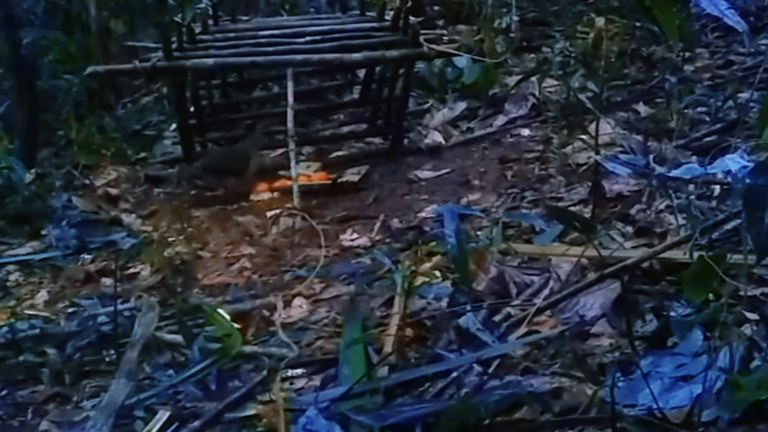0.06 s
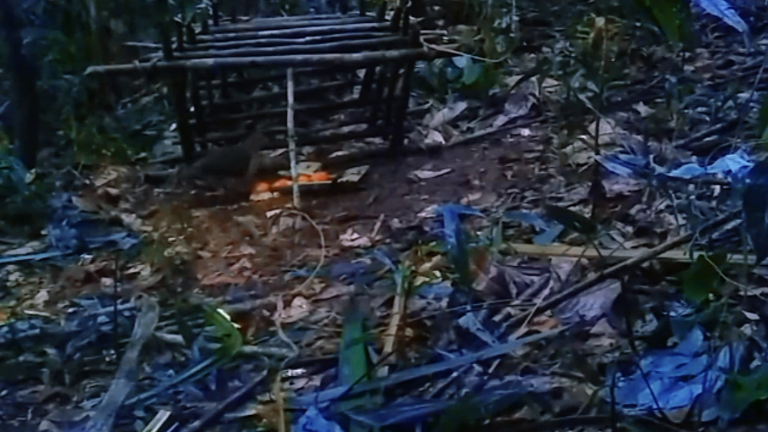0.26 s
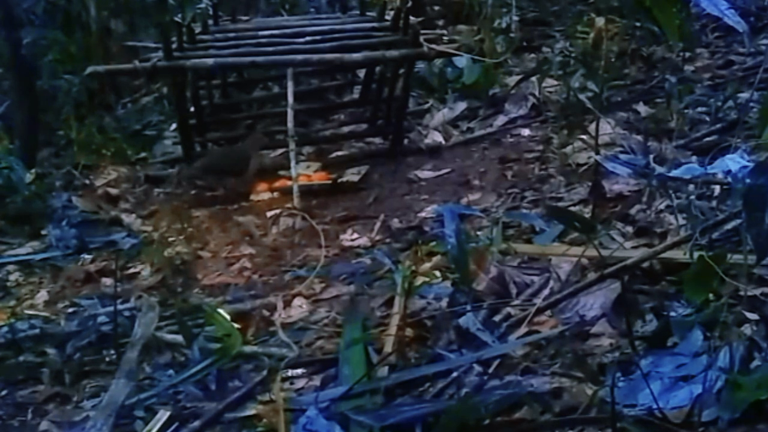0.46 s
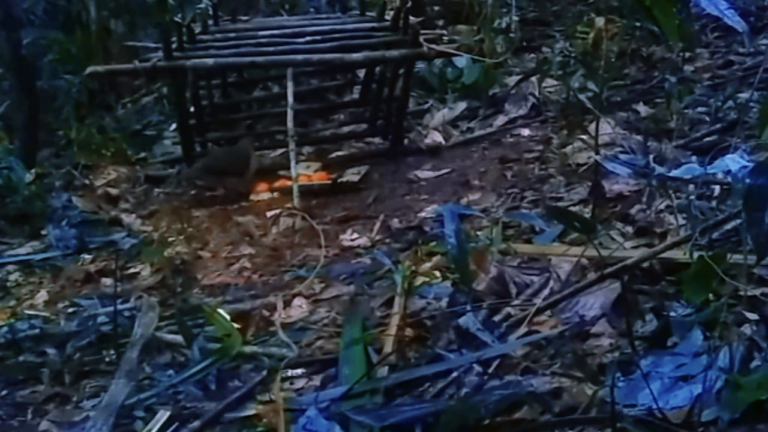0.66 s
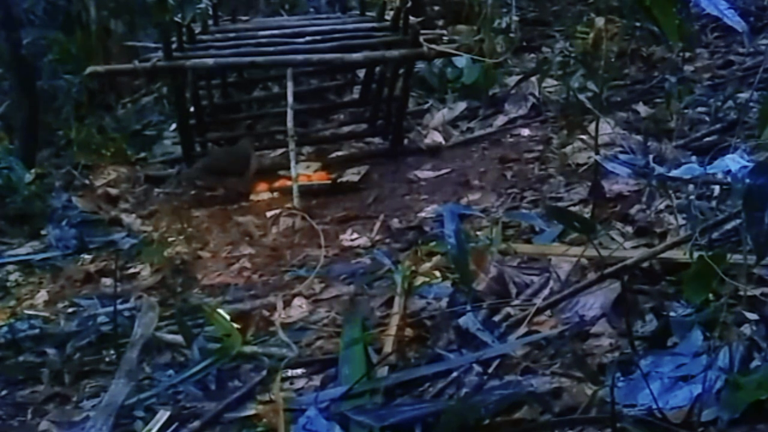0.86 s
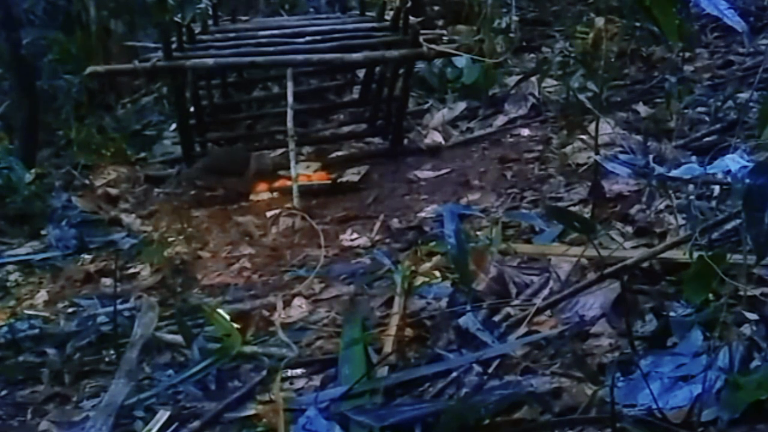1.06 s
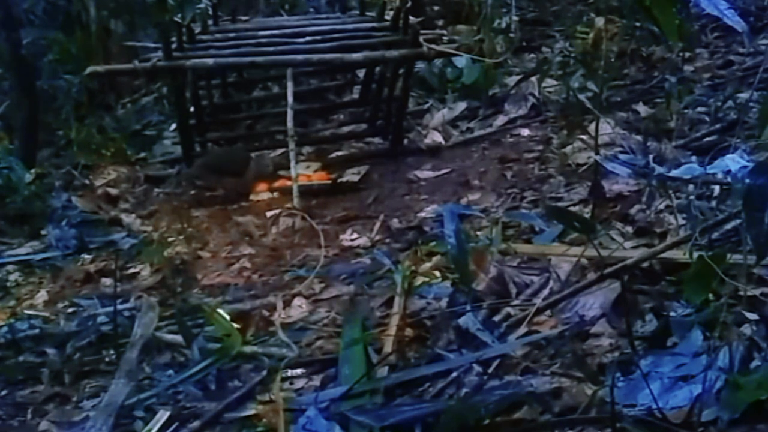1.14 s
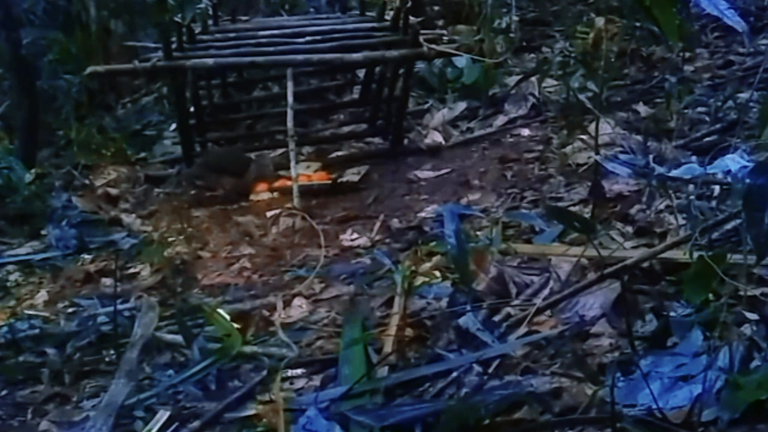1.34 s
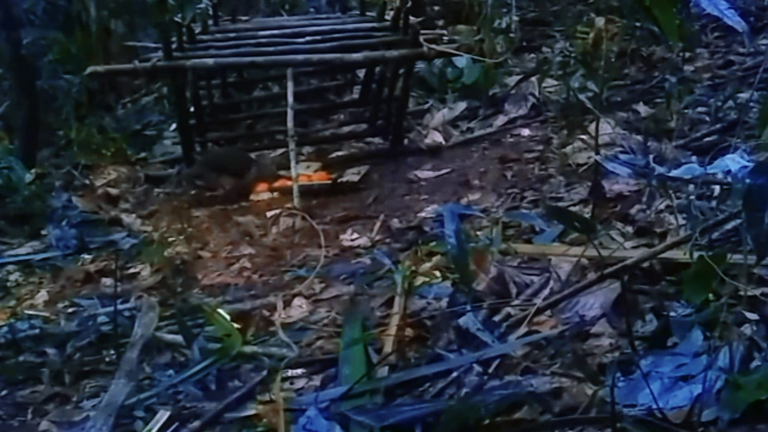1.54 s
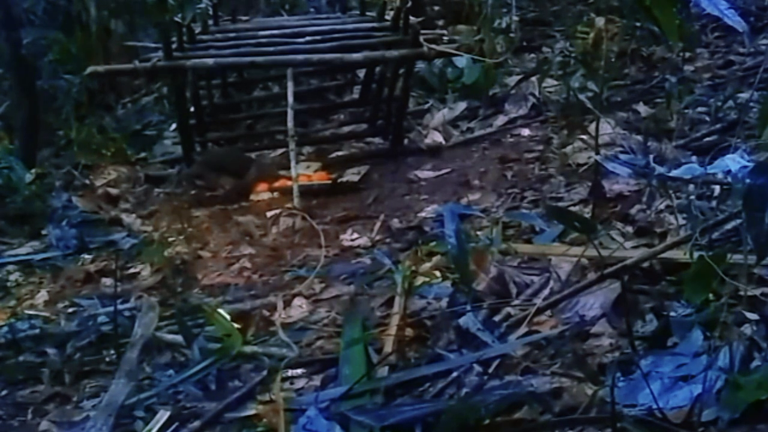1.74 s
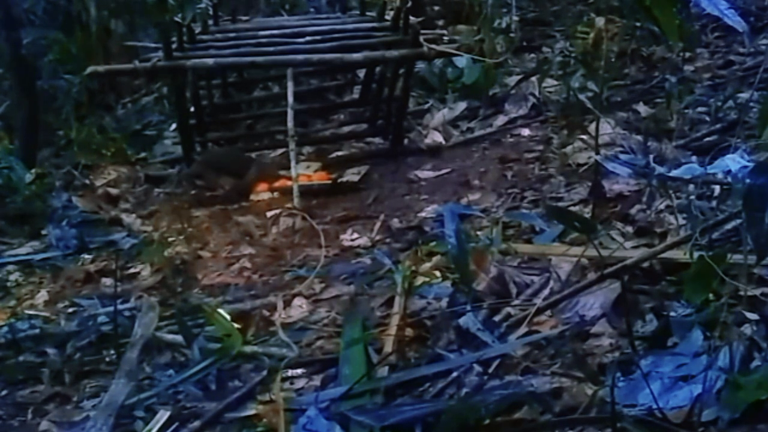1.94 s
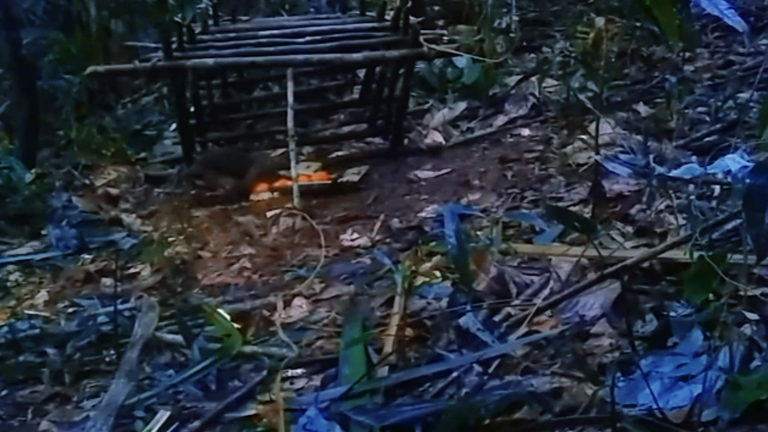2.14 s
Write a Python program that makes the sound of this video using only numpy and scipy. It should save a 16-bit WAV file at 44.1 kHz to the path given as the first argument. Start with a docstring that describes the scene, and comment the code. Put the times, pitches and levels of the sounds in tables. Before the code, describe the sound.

A loud, high whistle, probably a bird, rises, holds and drops in a quiet forest.

```python
"""First a distant bird pipes faintly over low rumble and foliage hiss; then one long whistle stands out.
The microphone is on a forest floor. The whistler, unseen and probably a bird, gives a fast squeaky rise,
a thin held note near 6.4 kHz and a final drop. Echoes from the trunks beat against the note and ring on.
Farther off, the short low piping continues, with thin notes of other animals and soft leaf rustles."""
import sys
import numpy as np
from scipy import signal
from scipy.fft import rfft, irfft
from scipy.io import wavfile
from scipy.ndimage import uniform_filter1d

SR = 44100
rng = np.random.default_rng(int(sys.argv[2]) if len(sys.argv) > 2 else 0)


def generate_wav(signal):
    """Clip the signal to [-1, 1] and save it as 16-bit WAV at the path in sys.argv[1]."""
    frames = np.transpose(np.atleast_2d(signal))
    scaled = np.clip(frames, -1, 1) * 32767
    pcm = np.round(scaled).astype(np.int16)
    wavfile.write(sys.argv[1], SR, pcm)


N = 97020
T = np.arange(N) / SR
CUT_HZ = 15700  # top of the recorder's range


# The whistle's three phases: t/s, f/Hz, fundamental level/dB, octave level/dB
RISE = [(.233, 682.4, -69, -45), (.237, 688, -48, -30), (.243, 819, -52, -35.5), (.251, 919, -47, -34.5),
        (.2545, 1010, -36, -52), (.258, 1452, -23, -36), (.262, 1483, -21.5, -40),
        (.265, 1594, -24.5, -50.5), (.27, 1893, -28, -58), (.276, 2224, -46.5, -65),
        (.285, 2706, -32, -41.5), (.294, 2740, -30.5, -41.5), (.301, 2777, -27.5, -45),
        (.305, 3116, -48.5, -58), (.322, 4240, -46, -57.5), (.335, 5100, -57, -60.5),
        (.344, 5480, -36, -51), (.352, 5900, -49.5, -41.5), (.368, 6480, -56, -45)]
HOLD = [(.38, 6430, -52, -46.5), (.405, 6520, -43, -35.5), (.422, 6640, -40, -33.5),
        (.443, 6448, -32.5, -47.5), (.47, 6410, -30.5, -50.5), (.51, 6365, -32, -45),
        (.565, 6316, -33.5, -33.5), (.61, 6328, -33, -39), (.655, 6278, -36, -38.5),
        (.695, 6402, -35.5, -41.5), (.745, 6400, -34, -41), (.785, 6486, -41, -50), (.85, 6510, -40.5, -44),
        (.91, 6416, -40, -40.5), (.965, 6230, -49, -46), (1.005, 6277, -42, -43), (1.023, 6132, -33.5, -42),
        (1.048, 6060, -40, -48), (1.064, 5997, -31, -45.5), (1.087, 5630, -29, -55),
        (1.108, 5515, -29.5, -56.5)]
FALL = [(1.118, 5280, -34.5, -58.5), (1.126, 4957, -47, -58), (1.131, 4394, -29.5, -70),
        (1.138, 3585, -33.5, -53.5), (1.148, 3311, -31.5, -52), (1.158, 3348, -33, -49),
        (1.162, 3357, -37.5, -74), (1.174, 3520, -62, -47)]
# Upper partials and rasp on the rise, before the throat colours them: t/s, level/dB
EDGE = [(.233, -62.5), (.24, -54.5), (.26, -54.5), (.272, -57), (.29, -47), (.305, -54), (.32, -49),
        (.335, -63.5), (.37, -82)]
# Throat resonances: f/Hz, gain/dB
THROAT = [(1800, -10), (2900, 7), (4100, -10), (5700, -2.5), (6900, -10.5), (8300, 1.5), (10000, -14),
          (12500, 9.5), (14000, 1), (15500, -18.5)]

def whistle():
    """Foreground: one gliding oscillator, rough on the rise, nearly pure when held, hissy as it drops."""
    call = list(RISE) + list(HOLD) + list(FALL)
    start, end = call[0][0], call[-1][0]
    gate = np.clip((T - start) / .002, 0, 1) * np.clip((end - T) / .004, 0, 1)
    rising = T < RISE[-1][0]
    hz = uniform_filter1d(curve(call), size=130)
    hz *= 1 + .0012 * wander(77) + .0088 * rising * wander(320)  # pitch jitter, strongest on the rise
    phase = 2 * np.pi * np.cumsum(hz) / SR
    tone = amp(curve(call, column=2) - 1.85 * wander(60)) * np.sin(phase)
    tone += amp(curve(call, column=3) + 2 * wander(45)) * np.sin(2 * phase)
    edge = amp(curve(EDGE)) * rising
    rolloff_db_per_octave, flicker_db = -6.5, 3
    for k in range(3, 16):
        db = rolloff_db_per_octave * np.log2(k / 3) + flicker_db * wander(129)
        tone += edge * amp(db) * colour_at(k * hz, THROAT) * (k * hz < CUT_HZ) * np.sin(k * phase)
    rasp = noise(lambda f: colour_at(f, THROAT) * f / (f + 700) / np.hypot(1, f / 3900))
    fall_hiss = swell(FALL[0][0], end - FALL[0][0]) * noise_band(hz=10500, width_hz=5000, power=4)
    return gate * (np.sqrt(2) * tone + amp(-1) * edge * rasp + amp(-65) * fall_hiss)


# Echo bands of the trees: f/Hz, early level/dB, early t60/s, late level/dB, late t60/s
SCATTER = [(660, -24, 0.41, -30.5, 0.91), (1450, -13, 0.4, -19, 0.27), (3230, -11.5, 0.25, -16, 0.92),
           (5770, -6.5, 0.24, -18, 0.69), (9300, -12.5, 0.2, -27.5, 0.29), (13000, -11, .16, -33.5, .6)]

def scatter(x):
    """Trunks and leaves around the microphone return dense echoes, with a quick and a slow decay."""
    centres = np.log([row[0] for row in SCATTER])
    build_up = 1 - np.exp(-T / .005)
    tail = 0
    for weights, (_, early_db, early_t60, late_db, late_t60) in zip(np.eye(len(SCATTER)), SCATTER):
        white = rng.standard_normal(N)
        band = shaped(white, lambda f: np.sqrt(np.interp(np.log(f + 1), centres, weights)))
        for db, t60 in ((early_db, early_t60), (late_db, late_t60)):
            decay = np.exp(-np.log(1000) * T / t60) * build_up
            tail += amp(db) * band * decay / np.sqrt(2 * np.sum(decay ** 2))
    return signal.fftconvolve(x, tail)[:N]


# Share of the whistle sent into the trees: t/s, gain/dB
SEND = [(.23, -3), (.32, -5), (.45, -8.5), (.68, 0), (.8, -1), (.92, 13), (1.02, 6), (1.09, -6),
        (1.16, 1.5)]

def through_trees(call):
    """The call reaches the microphone directly and by way of the trees; the paths beat together."""
    return call + scatter(call * amp(curve(SEND)))


# The distant bird's notes, before the direct and echo gains: t/s, length/s, f/Hz, level/dB
PIPES = [(0.097, 0.083, 926, -67), (0.128, 0.052, 1951, -62), (0.648, .07, 888, -75),
         (0.675, 0.063, 1783, -74.5), (0.733, 0.07, 1265, -71.5), (.82, 0.063, 2070, -61.5),
         (.82, .05, 1044, -71), (0.869, 0.034, 1314, -65.5), (1.17, .06, 877, -72),
         (1.256, 0.08, 1264, -74.5), (1.349, 0.057, 2075, -59), (1.35, 0.044, 1041, -68.5),
         (1.379, 0.043, 1830, -64), (1.395, .06, 1310, -64)]

def distant_bird():
    """Far from the microphone: short, slightly rising, wavering notes that blur among the trees."""
    glide, waver, attack_s = .08, .02, .0073
    notes = 0
    for start, length, hz, db in PIPES:
        ramp = np.clip((T - start) / length - .5, -.5, .5)
        pitch = hz * (1 + glide * ramp + waver * wander(110))
        phase = 2 * np.pi * np.cumsum(pitch) / SR
        envelope = np.clip((T - start) / attack_s, 0, 1) * np.clip(2 * (start + length - T) / length, 0, 1)
        tone = np.sin(phase) + amp(-13.5) * np.sin(2 * phase)
        notes += np.sqrt(2) * amp(db) * envelope * tone
    return amp(-4.5) * notes + amp(12.5) * scatter(notes)


# Other animals, before the direct and echo gains: t/s, length/s, start f/Hz, end f/Hz, level/dB
THIN_NOTES = [(.12, 0.11, 3800, 3900, -64.5), (.13, 0.072, 4700, 4750, -67),
              (0.642, .16, 3570, 3744, -74.5), (1.66, 0.57, 8800, 9750, -85)]

def far_animals():
    """Deep in the forest: faint, high, unsteady glides that arrive mostly as echo."""
    notes = 0
    for start, length, first_hz, last_hz, db in THIN_NOTES:
        glide = np.interp(T, [start, start + length], [first_hz, last_hz])
        notes += amp(db) * swell(start, length) * sine(glide * (1 + .027 * wander(300)))
    return amp(-5.5) * notes + amp(10) * scatter(notes)


# Spectrum of the forest ambience: f/Hz, relative level/dB
AMBIENCE = [(25, -7), (57, 3.5), (80, -8), (115, -1.5), (170, -9), (230, -6), (340, -16), (600, -11.5),
            (760, -21.5), (1250, -19.5), (2200, -21.5), (3000, -25.5), (4200, -26.5), (6500, -36),
            (10000, -47), (15000, -44.5)]
# Drift of its low rumble and of its foliage hiss: t/s, gain/dB
RUMBLE = [(0, 2), (.22, 7), (.33, -1), (.8, -3.5), (1.28, -4), (1.4, -1.5), (1.85, 1.5), (2.2, 2.5)]
HISS = [(0, 5), (.2, 10.5), (.5, 2), (1.0, -1.5), (1.3, -4), (1.38, 4.5), (1.65, 3.5), (1.9, 3.5),
        (2.08, -1), (2.2, 1.5)]

def rumble_and_foliage():
    """All around the microphone: rumble below about 950 Hz and foliage hiss above, drifting separately."""
    bed = amp(-65.5) * noise(lambda f: colour_at(f, AMBIENCE))
    low = shaped(bed, lambda f: 1 / (1 + (f / 950) ** 4))
    hiss = (bed - low) * amp(curve(HISS) + 1.1 * wander(6.4))
    return low * amp(curve(RUMBLE)) + hiss


def hum():
    """Down in the rumble: a faint, wavering tone near 151 Hz."""
    return amp(-75) * sine(151 + 1.2 * wander(2))


# Stirrings in the leaves: t/s, length/s, centre f/Hz, width/Hz, level/dB
RUSTLES = [(-.1, 0.57, 9076, 6190, -78), (0.791, 0.28, 3420, 2200, -71), (1.309, .2, 4170, 3033, -65.5),
           (1.631, 0.099, 10750, 4990, -83)]

def leaf_rustles():
    """In the background, leaves stir in soft swells of high noise."""
    return sum(amp(db) * swell(start, length) * noise_band(hz, width_hz, power=2)
               for start, length, hz, width_hz, db in RUSTLES)


def amp(db):
    return 10 ** (np.asarray(db) / 20)


def curve(rows, column=1):
    """One column of a table, joined by straight lines in time."""
    rows = np.array(rows)
    return np.interp(T, rows[:, 0], rows[:, column])


def colour_at(hz, points):
    """Gain of a spectrum at the given frequencies."""
    f, db = np.array(points).T
    return amp(np.interp(np.log(hz + 1), np.log(f), db))


def shaped(x, gain):
    """Filter by a gain that is a function of frequency."""
    return irfft(rfft(x) * gain(np.arange(N // 2 + 1) * SR / N), N)


def noise(gain):
    """Coloured noise with RMS 1."""
    x = shaped(rng.standard_normal(N), gain)
    return x / np.sqrt(np.mean(x ** 2))


def noise_band(hz, width_hz, power):
    """Noise around hz; a higher power steepens the sides."""
    return noise(lambda f: 1 / (1 + (2 * (f - hz) / width_hz) ** power))


def wander(rate_hz):
    """Smooth random motion with RMS 1."""
    return noise(lambda f: 1 / (1 + (f / rate_hz) ** 4))


def sine(hz):
    """A tone with RMS 1 that follows a pitch curve."""
    return np.sqrt(2) * np.sin(2 * np.pi * np.cumsum(hz) / SR)


def swell(start, length):
    """A rounded rise and fall."""
    return np.sin(np.pi * np.clip((T - start) / length, 0, 1))


def scene():
    """Calls and ambience meet at one microphone on the forest floor."""
    calls = through_trees(whistle()) + distant_bird() + far_animals()
    return (calls + rumble_and_foliage() + hum() + leaf_rustles())[None]


def record(dry):
    """The recorder cuts the top steeply."""
    return signal.sosfilt(signal.ellip(10, .2, 80, CUT_HZ, fs=SR, output="sos"), dry)


dry = scene()
out = record(dry)
generate_wav(out)
```